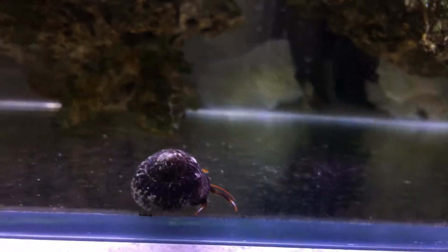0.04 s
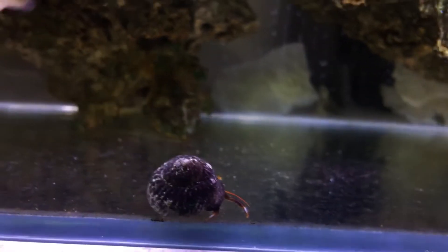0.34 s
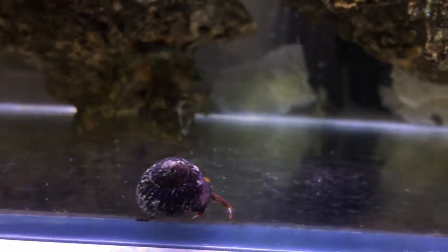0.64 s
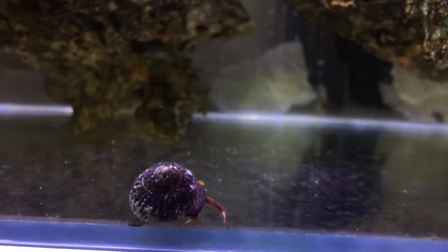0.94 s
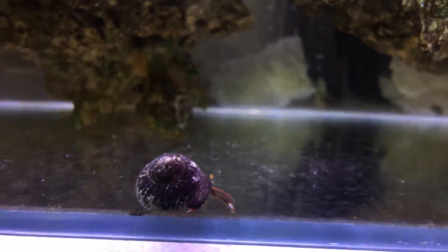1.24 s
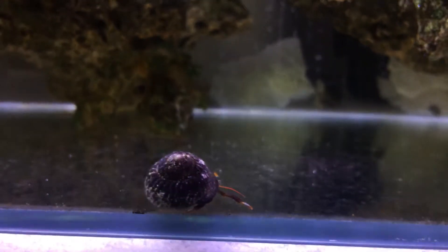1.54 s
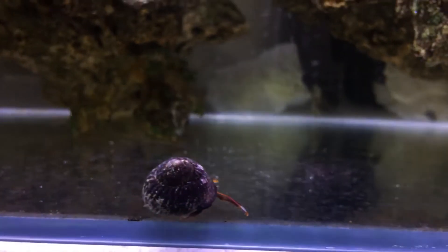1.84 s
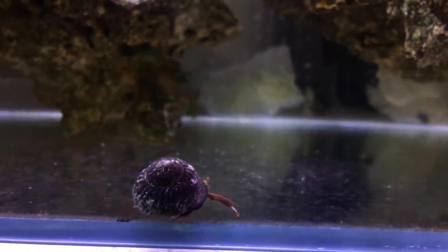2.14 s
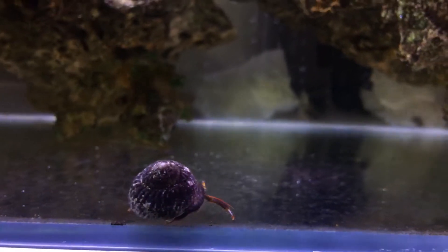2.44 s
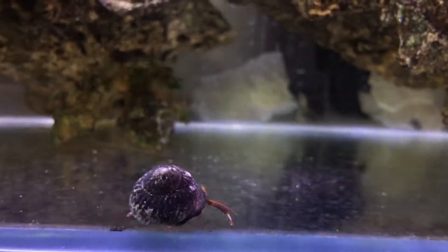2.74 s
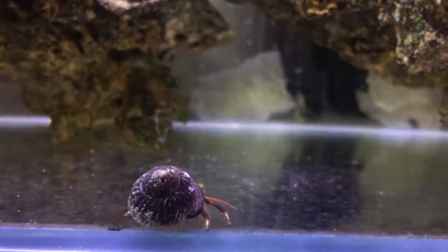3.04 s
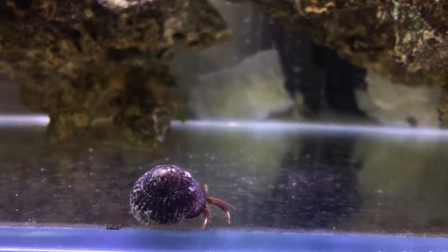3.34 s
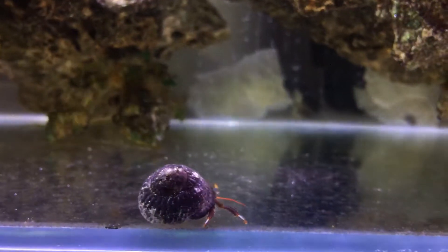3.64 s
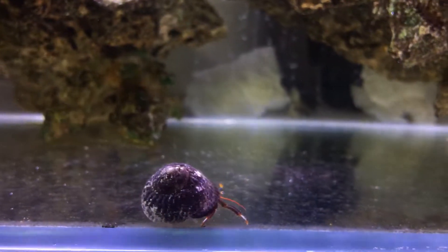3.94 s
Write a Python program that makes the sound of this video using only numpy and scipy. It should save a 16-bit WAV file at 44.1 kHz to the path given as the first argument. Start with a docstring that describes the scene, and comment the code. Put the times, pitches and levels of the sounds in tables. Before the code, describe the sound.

Aquarium pumps hum and pulse steadily while a hermit crab's shell faintly ticks and scrapes.

```python
"""A low aquarium hum throbs twice a second: two pump motors run at nearly the same speed and beat.
Around it are mains buzz, a fan's note, thin whines and the wash of moving water and air, which stirs
cabinet and room resonances. At 1.5 s the hum and the wash step up. Faint ticks and a few short
rustles, perhaps a hermit crab's legs and shell, sit on top, with one tiny squeak."""
import sys
import numpy as np
from scipy import signal
from scipy.fft import rfft, irfft
from scipy.io import wavfile
from scipy.ndimage import uniform_filter1d

SR = 44100
rng = np.random.default_rng(int(sys.argv[2]) if len(sys.argv) > 2 else 0)


def dump_mix(stems):
    """Bounce the given channels to the path in sys.argv[1] as a 16-bit WAV at rate SR."""
    frames = np.atleast_2d(stems).T  # one column per channel
    limited = np.clip(frames, -1, 1)  # hard clip at full scale
    pcm = np.round(limited * 32767).astype(np.int16)
    wavfile.write(sys.argv[1], SR, pcm)


N = 176400
T = np.arange(N) / SR
MAINS_HZ = 60
STEP_S = 1.5  # the hum steps up


def undb(db):
    """Decibels to gain."""
    return 10 ** (np.asarray(db) / 20)


def ramp(middle_s, length_s):
    """Linear rise from 0 to 1."""
    return np.clip((T - middle_s) / length_s + .5, 0, 1)


def drift(rate_hz):
    """Smooth random drift, rms near 1."""
    hold = int(SR / rate_hz)
    stairs = np.repeat(rng.standard_normal(N // hold + 1), hold)
    return 1.278 * uniform_filter1d(uniform_filter1d(stairs, hold), hold)[:N]


def noise(gain):
    """Unit-rms noise with spectrum gain(Hz)."""
    hz = np.maximum(np.fft.rfftfreq(N, 1 / SR), 1)
    shaped = irfft(rfft(rng.standard_normal(N)) * gain(hz), N)
    return shaped / shaped.std()


def coloured(spectrum):
    """Unit-rms noise shaped by (frequency [Hz], relative density [dB]) points."""
    hz, db = np.array(spectrum).T
    return noise(lambda f: undb(np.interp(np.log(f), np.log(hz), db)))


def resonance(hz, width_hz, db):
    """Steep resonance driven by noise."""
    return undb(db) * noise(lambda f: 1 / (1 + ((f * f - hz * hz) / (f * width_hz)) ** 2))


def tone(hz, db, waver_hz, flutter_db):
    """Sine with drifting pitch and level."""
    cycles = np.cumsum(hz + waver_hz * drift(6)) / SR + rng.random()
    return np.sqrt(2) * undb(db + flutter_db * drift(8)) * np.sin(2 * np.pi * cycles)


def pumps():
    """Two motors slip in and out of phase; the stronger one has overtones."""
    # stronger motor's partials: (harmonic [-], level before trim [dB])
    partials = [(1, -41), (2, -58), (3, -63.5), (5, -68), (6, -67.5)]
    strong_hz, weak_hz, in_phase_s = 57.2, 59.15, 2.215
    before_step = 1 - ramp(STEP_S, length_s=.037)
    strong_db = partials[0][1] - 4.5 * before_step
    weak_db = -49 - 13 * before_step
    overtone_trim_db = -1.5 - 1.5 * before_step
    rad_per_hz = 2 * np.pi * (T - in_phase_s)
    phase_rad = 2 * np.pi * rng.random()
    strong = undb(strong_db) * np.cos(strong_hz * rad_per_hz + phase_rad)
    weak = undb(weak_db) * np.cos(weak_hz * rad_per_hz + phase_rad)
    overtones = sum(tone(k * strong_hz, db, waver_hz=.1, flutter_db=1.4) for k, db in partials[1:])
    return np.sqrt(2) * (strong + weak) + undb(overtone_trim_db) * overtones


def mains_buzz():
    """Near-steady harmonics of the mains."""
    # buzz partials: (harmonic [-], level [dB])
    partials = [(2, -58.5), (3, -61.5), (4, -60.5), (6, -59), (7, -79), (8, -70.5), (9, -75.5), (10, -78.5)]
    return sum(tone(k * MAINS_HZ, db, waver_hz=.08, flutter_db=1.33) for k, db in partials)


def flow():
    """Water and air noise, pulsing slightly at twice the mains rate; a wash joins near the step."""
    # steady water and room noise: (frequency [Hz], relative density [dB])
    steady_spectrum = [(15, -30), (32, -6.5), (80, 1), (130, -2), (260, -7), (400, -9.5), (600, -14.5),
                       (1000, -18.5), (1600, -23), (2450, -26), (2850, -29), (3500, -29), (4400, -32.5),
                       (4950, -38.5), (5300, -35), (6100, -36), (7600, -41.5), (9000, -40.5), (9900, -43),
                       (10400, -48), (11200, -43.5), (16000, -46.5)]
    # added wash: (frequency [Hz], relative density [dB])
    wash_spectrum = [(200, -10.5), (450, 3), (700, 1), (900, -0.5), (1200, 1), (1450, -8.5), (1800, -12),
                     (2500, -11.5), (5000, -44)]
    pulse_db = .5 * np.sin(2 * np.pi * 2 * MAINS_HZ * T)
    steady = undb(-55 + pulse_db + .48 * drift(9)) * coloured(steady_spectrum)
    wash = undb(-62 + .5 * drift(11)) * coloured(wash_spectrum)
    return steady + wash * ramp(middle_s=1.464, length_s=.07)


def booms():
    """Cabinet and room resonances stirred by the flow; an extra one fades out by the step."""
    # steady resonances: (frequency [Hz], width [Hz], level [dB])
    modes = [(49.7, 8.4, -57.5), (60.6, 15, -57.5), (182.3, 20, -62.5), (296, 16, -70.5),
             (369.7, 29, -66.5)]
    fade = np.sqrt(np.clip(1 - T / STEP_S, 0, 1))
    early = fade * resonance(hz=184, width_hz=22, db=-52.5)
    return early + sum(resonance(*mode) for mode in modes)


def fan():
    """A fan's single wavering note."""
    return tone(hz=314.6, db=-62.5, waver_hz=.4, flutter_db=1.7)


def whines():
    """Wavering tones of the tank's fittings, plus faint thin whistles."""
    # whines: (frequency [Hz], level [dB], rms waver [Hz])
    lines = [(30.7, -69, .3), (430, -69, 2.5), (692.6, -80.5, 2.2), (1312, -81.5, 1.5)]
    # whistles: (frequency [Hz], width [Hz], level [dB])
    whistles = [(1626, 12, -86), (2325, 16, -83), (12521, 30, -102)]
    whining = sum(tone(*line, flutter_db=1.5) for line in lines)
    return whining + sum(resonance(*band) for band in whistles)


def ticks():
    """Short scrapes on a hard shell: clear timed ones and fainter random grains."""
    # clear scrapes: (time [s], relative level [dB])
    scrapes = [(.021, -63), (.160, -60), (.488, -69), (.538, -64), (.589, -68), (.755, -66), (0.939, -66.5),
               (1.104, -69), (1.222, -67), (1.387, -63.5), (1.478, -65), (1.555, -70), (1.739, -63),
               (1.805, -68), (2.089, -64), (2.205, -70), (2.621, -66.5), (3.205, -64), (3.303, -65.5),
               (3.414, -67), (3.476, -68), (3.538, -68)]
    # shell resonances: (frequency [Hz], width [Hz], relative level [dB])
    shell_modes = [(3530, 530, 5), (4530, 640, -3), (5760, 960, -2.5)]
    grains_per_s, rise_s, decay_s, gain_db = 18, .0009, .0036, 5
    grains = rng.random(N) < grains_per_s / SR
    impulses = grains * undb(-71.5 + 2 * rng.standard_normal(N))
    for time_s, db in scrapes:
        impulses[int(time_s * SR)] += undb(db)
    age_s = T[:SR // 10]
    contact = (1 - np.exp(-age_s / rise_s)) * np.exp(-age_s / decay_s)
    envelope = signal.fftconvolve(impulses, contact)[:N]
    ring = sum(resonance(*mode) for mode in shell_modes)
    return undb(gain_db) * envelope * ring / ring.std()


def rustles():
    """Brief uneven rubbing: rough noise in Gaussian swells."""
    # rubs: (centre time [s], half length [s], level [dB])
    rubs = [(1.48, .04, -70), (3.425, .022, -66.5), (3.485, .02, -68)]
    # rubbing noise: (frequency [Hz], relative density [dB])
    spectrum = [(400, -33), (1300, 2.5), (2500, -2), (3350, -1), (4000, -9), (6600, -13.5), (8500, -28),
                (16000, -33)]
    swells = sum(undb(db) * np.exp(-((T - centre_s) / half_s) ** 2) for centre_s, half_s, db in rubs)
    roughness_db = 5.5 * drift(120)
    return swells * undb(roughness_db) * coloured(spectrum)


def squeak():
    """One thin, uneven tone that droops."""
    start_s, length_s, start_hz, fall_hz = 2.02, .115, 8300, 1000
    progress = np.clip((T - start_s) / length_s, 0, 1)
    arch = 2 * np.sqrt(progress * (1 - progress))
    glide = tone(start_hz - fall_hz * progress ** 2, db=-90, waver_hz=20, flutter_db=1)
    roughness_db = 2 * drift(80)
    return arch * glide * undb(roughness_db)


def scene():
    """All sources, mono, close to the tank."""
    return (pumps() + mains_buzz() + flow() + booms() + fan() + whines()
            + ticks() + rustles() + squeak())[None]


def record(dry):
    """Steep low-pass on the top treble."""
    cutoff_hz = 15750
    return signal.sosfilt(signal.ellip(10, .1, 80, cutoff_hz, fs=SR, output="sos"), dry)


dry = scene()
out = record(dry)
dump_mix(out)
```